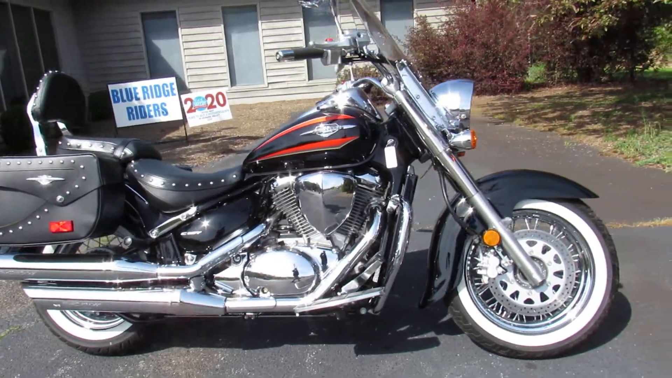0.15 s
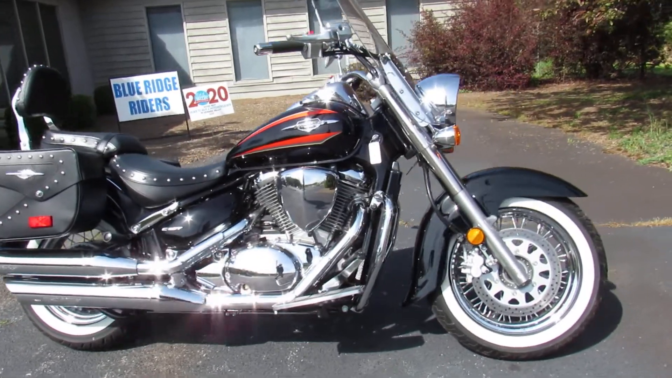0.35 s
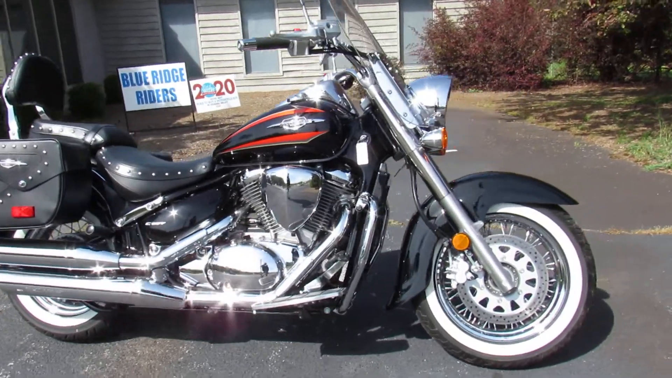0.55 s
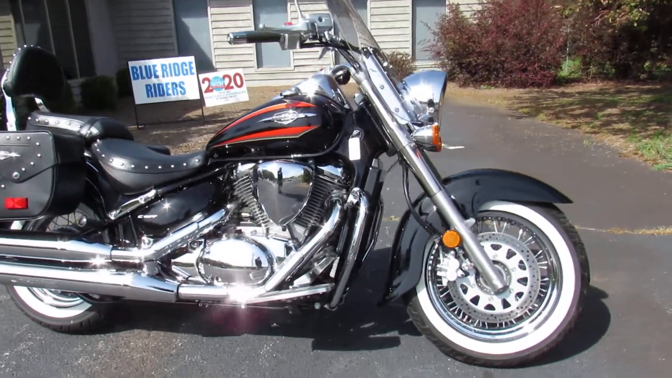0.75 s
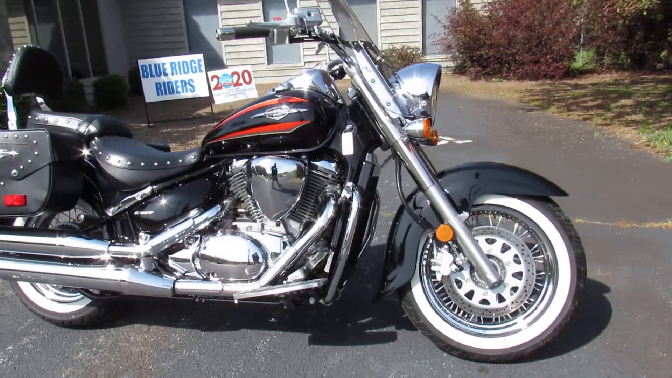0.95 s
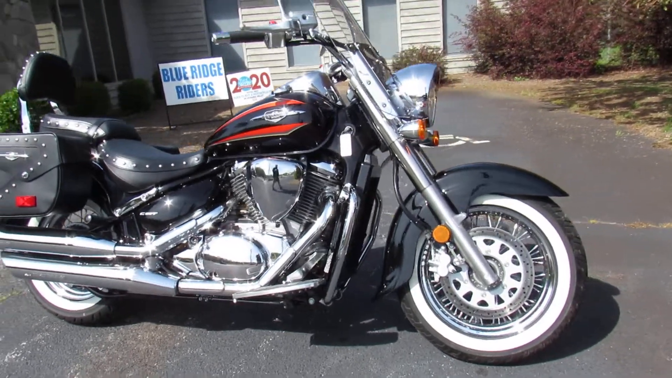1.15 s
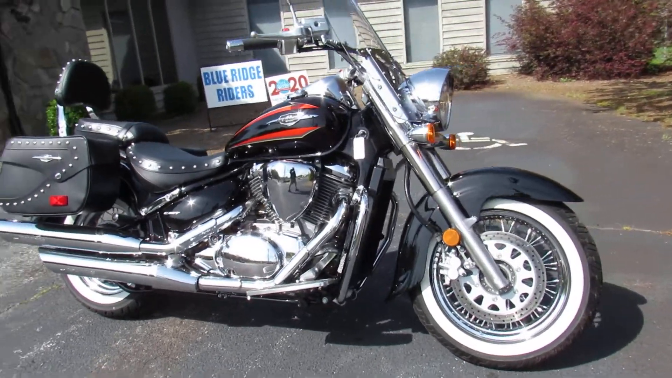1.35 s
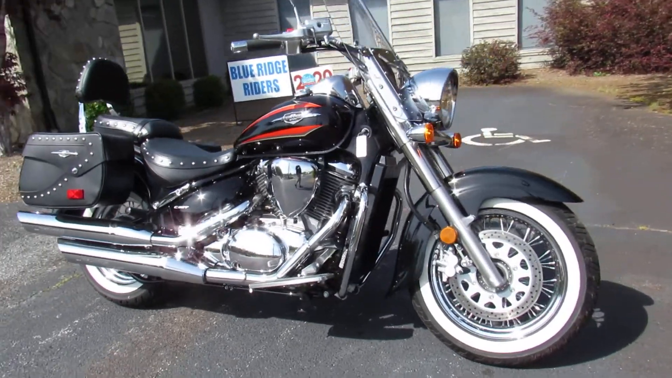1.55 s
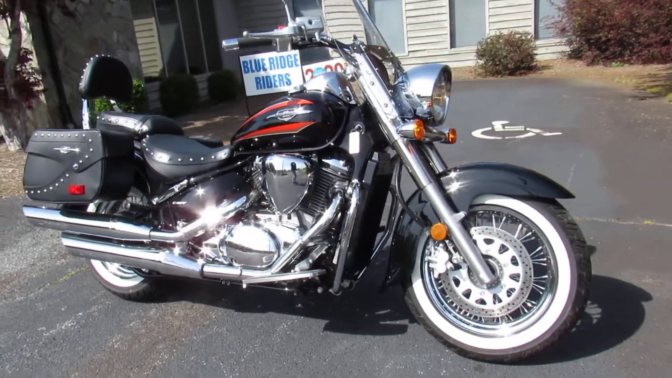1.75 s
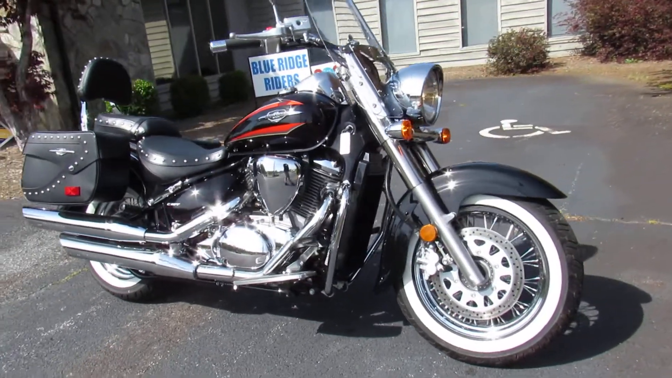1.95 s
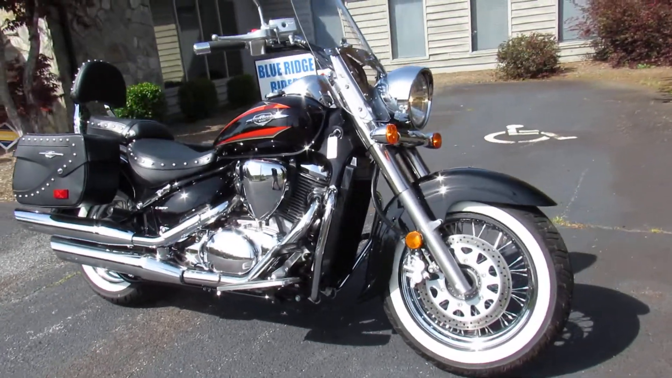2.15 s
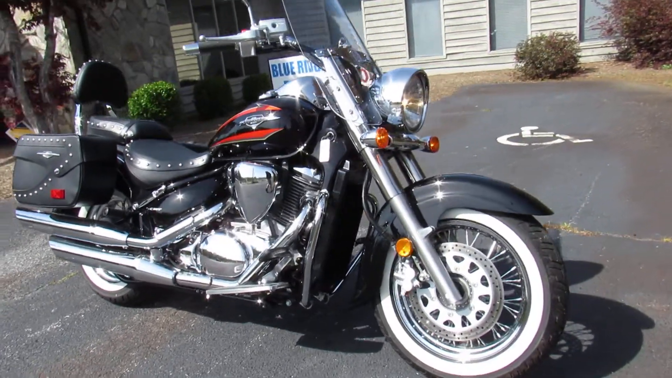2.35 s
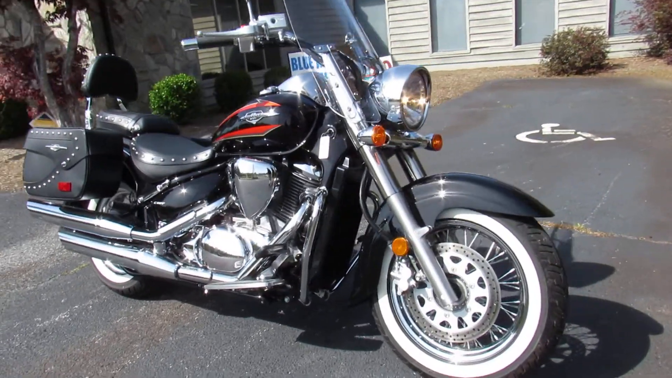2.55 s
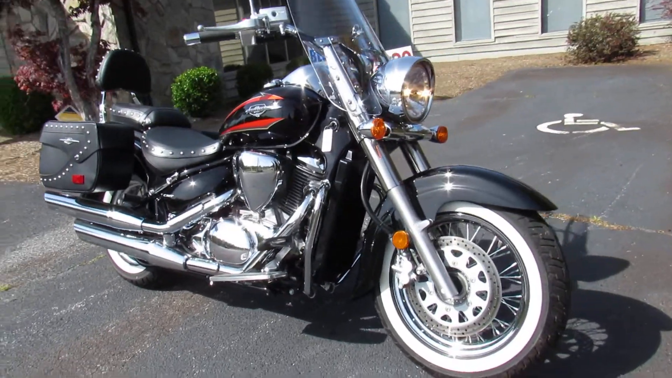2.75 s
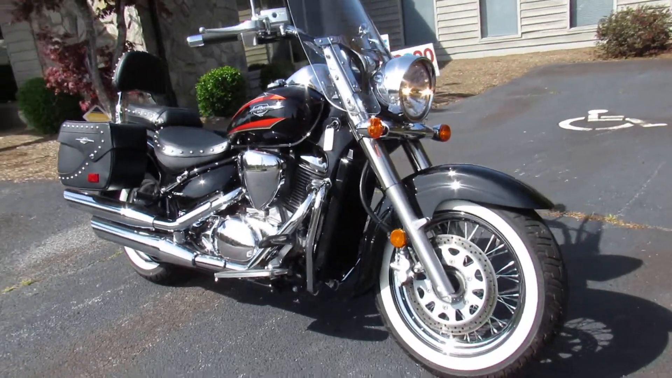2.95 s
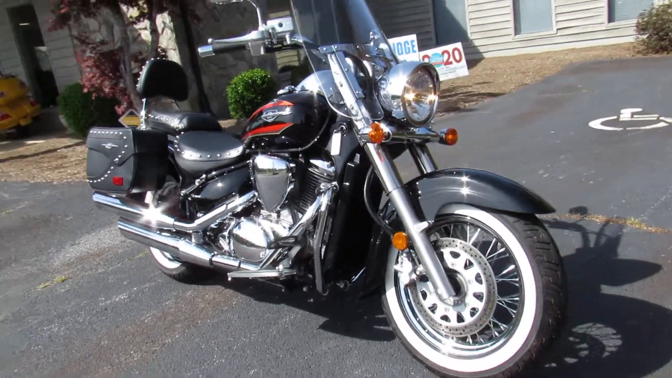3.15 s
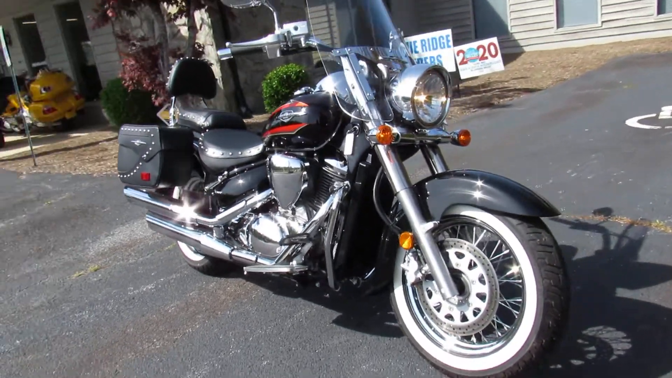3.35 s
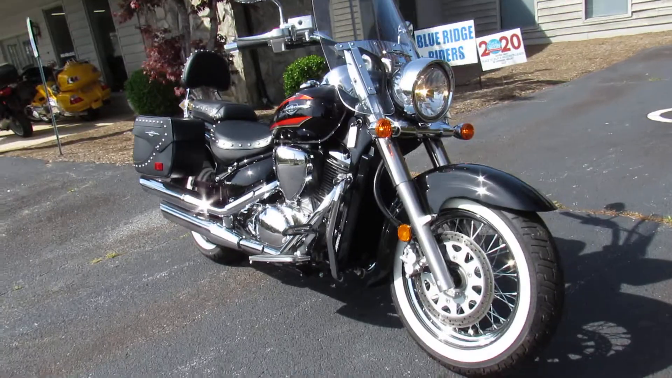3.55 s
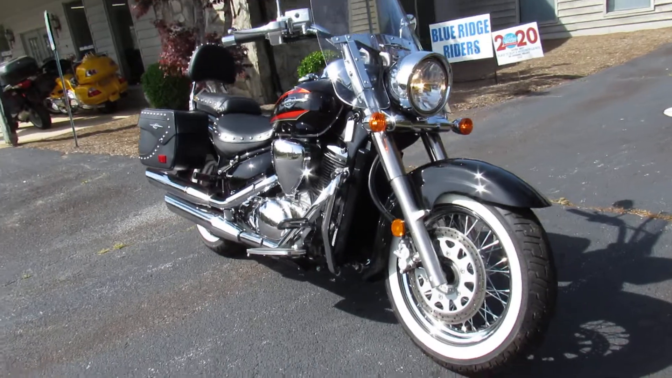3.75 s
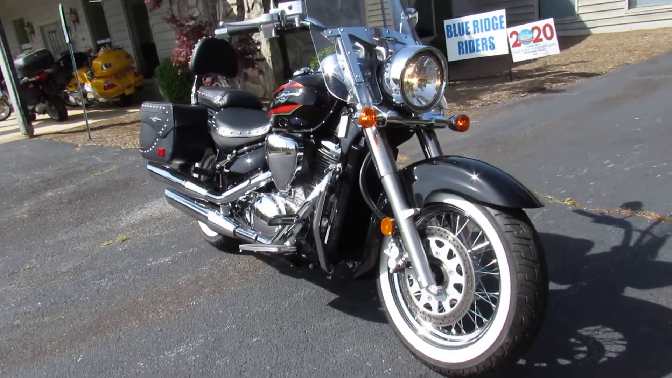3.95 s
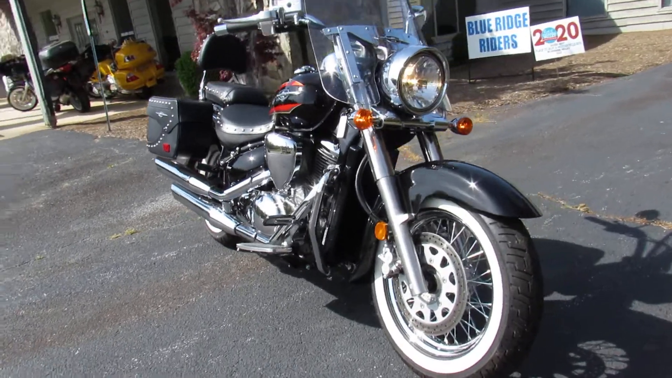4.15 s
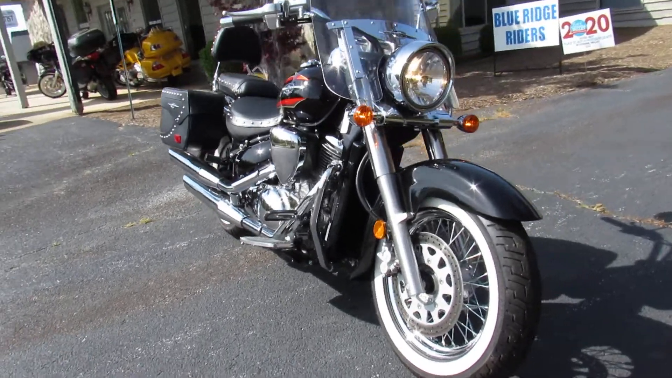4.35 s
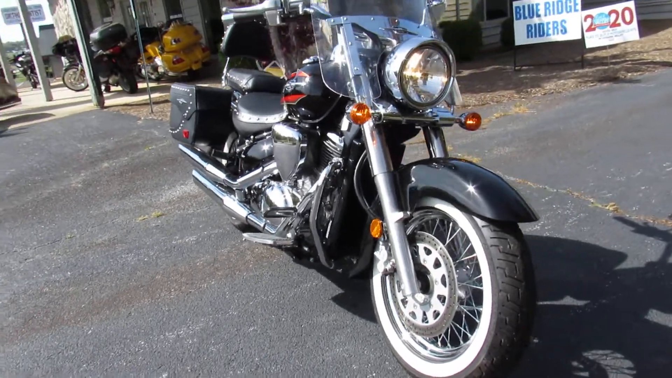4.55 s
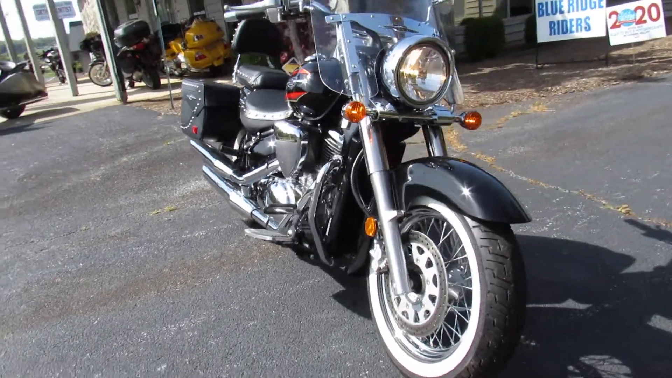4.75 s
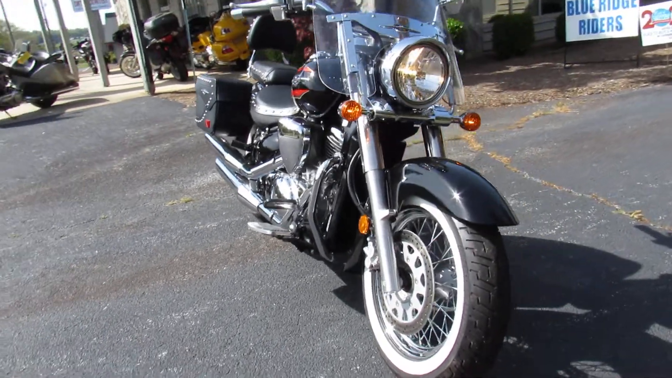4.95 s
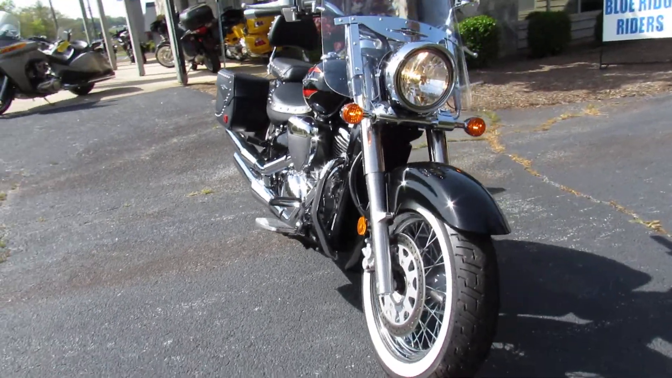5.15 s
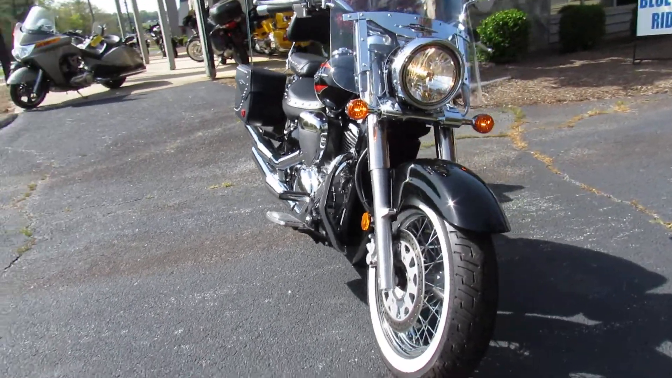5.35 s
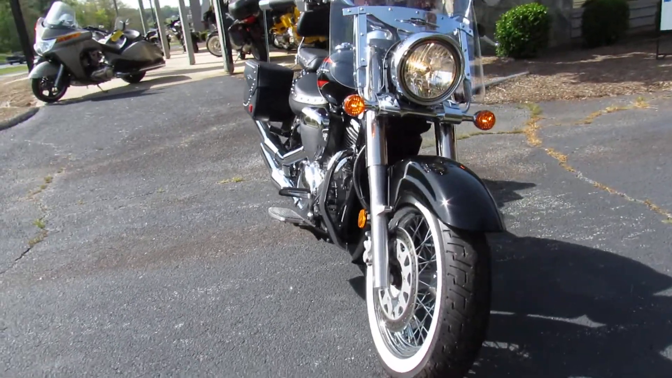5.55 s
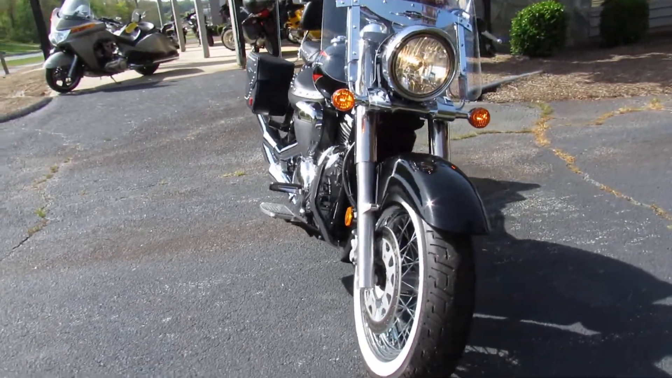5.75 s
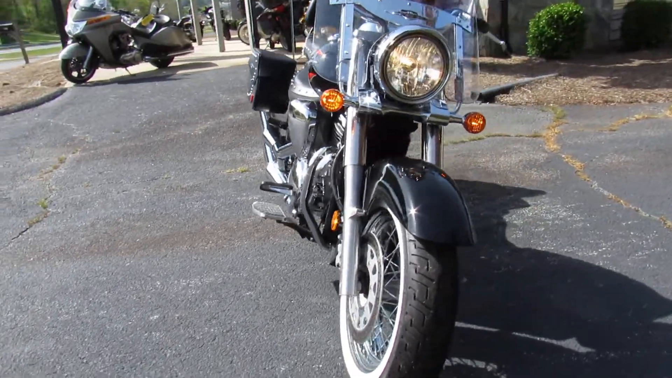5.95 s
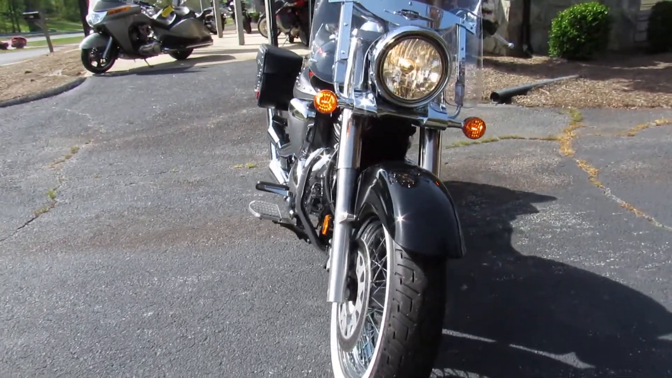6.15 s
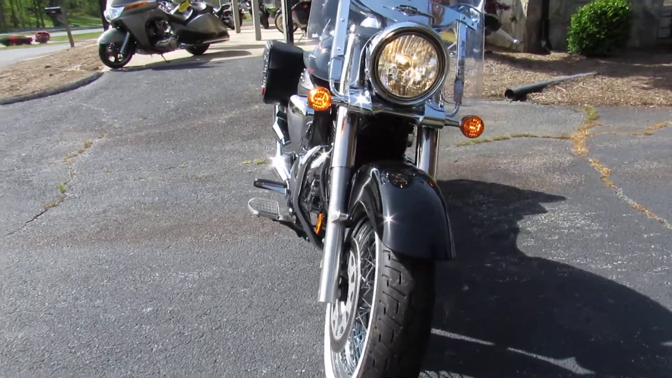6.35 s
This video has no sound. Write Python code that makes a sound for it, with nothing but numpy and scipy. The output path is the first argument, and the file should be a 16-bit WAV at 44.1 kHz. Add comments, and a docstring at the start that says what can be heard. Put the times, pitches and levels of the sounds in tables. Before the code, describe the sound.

Outdoors on a paved lot, a big twin-cylinder motorcycle idles with a lopsided, quick chug. At first it is quiet and wind gusts rumble, flutter and slap the handheld stereo microphone. After about a second and a half the wind fades, and as the microphone walks round toward the front wheel, the exhaust thump, metallic clatter and valve ticking swell, then hold close and loud.

```python
"""Idling V-twin motorcycle, walked round

A V-twin idles on an open car park while a microphone pair comes closer and walks round to the front wheel.
Two unevenly spaced firings a cycle ring two exhaust pipes; intake gulps breathe in an air box.
Shaped noise makes the clatter of pistons, rockers and valves in the finned block.
Early on, gusts and single eddies buffet the microphone ports with rumble and flutter."""
import sys
import numpy as np
from scipy import signal
from scipy.fft import rfft, irfft
from scipy.io import wavfile

SR = 44100
rng = np.random.default_rng(int(sys.argv[2]) if len(sys.argv) > 2 else 0)


def put_to_file(sound):
    """Save the sound as 16-bit audio at rate SR, in the file named by the first command-line argument."""
    columns = np.atleast_2d(sound).T  # one column per channel
    safe = np.clip(columns, -1, 1)
    whole_steps = np.round(safe * 32767)
    wavfile.write(sys.argv[1], SR, whole_steps.astype(np.int16))


N = 282240
TIME, HZ = np.arange(N) / SR, np.fft.rfftfreq(N, 1 / SR)  # s, Hz

# Idle speed in four-stroke cycles: [start_s, cycles_per_s]
IDLE_SPEED = [(0, 9.43), (.625, 9.44), (1.31, 9.524), (1.86, 10.06), (1.93, 9.36), (2.48, 9.648),
              (3.023, 9.992), (3.279, 9.613), (3.601, 10.138), (3.983, 9.639), (4.455, 10.289),
              (4.898, 9.618), (5.018, 9.852), (5.749, 10.006), (6.4, 9.799)]
# Engine loudness on the approach, before each part's own level: [start_s, level_db]
APPROACH = [(0.0, -49), (0.63, -46), (1.47, -45), (5.18, -31.5), (6.3, -33.5)]
EXHAUST_DB, INTAKE_DB, CLATTER_DB, RATTLE_DB, TICKS_DB = 16.5, -6.5, 1.14, -7, -13.5  # on top of APPROACH

# At first the microphones stand beside the mufflers and get more of their thump
BESIDE_DB, BESIDE_S = 1, 2.8
# For a while they face the air box and are turned away from the mufflers
ABREAST_S, ABREAST_HALF_S = 4.2, 0.93
ABREAST_EXHAUST_DB, ABREAST_INTAKE_DB, ABREAST_CLATTER_DB = -0.5, 7, 0.75
# Then at the front, wheel and fork hide the valves, while the exhaust bends round them
HEAD_ON_S, HEAD_ON_TICKS_DB_PER_S, HEAD_ON_EXHAUST_DB_PER_S = 5.13, -1.5, 1.5

# Pipe modes, roughly rising in pitch, sign alternating from row to row, relative levels:
# [pitch_hz, width_hz, level_db]
FRONT_PIPE_MODES = [(45, 11, -5.5), (94, 11, -2), (106, 11, -6), (154, 29, -11), (157, 9, -6.5),
                    (234, 24, -20), (240, 9, -15.5)]
REAR_PIPE_MODES = [(44, 11, -5.5), (95, 11, -4), (138, 17, -6), (135, 50, -9), (168, 11, -13),
                   (209, 14, -16), (210, 50, -19)]
# Ringing of the mufflers' steel shells, relative levels: [pitch_hz, width_hz, level_db]
SHELL_MODES = [(189.7, 22, -25), (264, 24, -25), (340, 8, -28), (389.4, 17, -28.5), (542, 44, -35)]
# Colour of gas rushing out of the mufflers, relative: [pitch_hz, level_db]
RUSH_COLOUR = [(20, -50), (50, -0.5), (90, 1.5), (160, 2.5), (240, -3.5), (300, -8.5), (370, -5),
               (480, -13), (560, -12.5), (900, -15.5), (2000, -57)]

# Blows within one cycle, against the steady churn's scale: [place_cycles, knock_db, rocker_db, decay_s]
BLOWS_IN_CYCLE = [(.135, -4, -6, .006), (.165, -1, -3, .006), (.335, -13, -5, .005), (.775, 1.5, 1.5, .007),
                  (.88, -10, -15, .005)]
# Valves seating within one cycle: [place_cycles, side_db, front_db, decay_s]
SEATS_IN_CYCLE = [(.14, -16, 0, .006), (.36, 0, -2, .006), (.44, -7, -9, .005), (.645, -3, -6, .006),
                  (.755, -4, -5, .007)]
VALVE_DRIFT_CYCLES = -.045  # the ticks come earlier from the front than from the side
# Louder clinks of the cam chain, on the rattle's envelope: [start_s, level_db]
CHAIN_CLINKS = [(1.494, -6), (3.543, 8), (4.1, 4)]
# Colours of block clatter, rocker and chain rattle, and valve ticks, relative: [pitch_hz, level_db]
CLATTER_COLOUR = [(200, -19), (500, -1), (800, -3.5), (990, 1.5), (1250, 0), (1550, -2), (2000, -16),
                  (2700, -13.5), (3400, -22), (4200, -33.5), (7000, -40), (14000, -58)]
RATTLE_COLOUR = [(900, -33), (1450, 3.5), (1900, -1.5), (2400, -2.5), (3200, -9.5), (4300, -18.5),
                 (8000, -45)]
TICK_COLOUR = [(1000, -15), (3000, -10.5), (4200, 2), (4900, 0.5), (6000, 1), (7500, -1), (9000, -2),
               (11000, -11), (13000, -7), (14500, -30)]
# Ringing of cooling fins and covers, over the noise that drives them: [pitch_hz, width_hz, level_db]
FIN_MODES = [(1025, 400, -13), (2020, 230, 0), (2610, 38, 0), (2960, 48, -22), (3094, 140, -5),
             (3430, 170, -2), (3816, 32, 4.5), (4470, 41, -3), (4760, 59, 1), (4890, 38, -1.5),
             (5250, 19, -8), (5905, 20, 2), (6580, 38, -5)]

# Gusts on the ports, pitch gliding from row to row: [middle_s, length_s, rumble_db, flutter_db, flutter_hz]
GUST_LIST = [(0.107, 0.066, -24, -41, 199.3), (0.271, 0.11, -23, -20, 370.7), (0.321, 0.025, -39, -25, 399),
             (.38, 0.037, -26.5, -35, 300), (0.49, 0.14, -33, -36, 250), (0.744, 0.04, -35, -21.5, 300),
             (0.83, 0.094, -20, -25.5, 220), (0.956, 0.032, -42, -50, 220),
             (1.181, 0.12, -28.5, -31, 288.5), (1.269, 0.15, -18.5, -17.5, 327.8),
             (1.41, 0.085, -28, -37, 249.4), (1.543, 0.045, -24, -21.5, 249.2),
             (1.597, 0.064, -17, -21.5, 229.3), (1.672, 0.047, -23, -30, 216.2),
             (2.386, 0.25, -23.5, -42, 220)]
# Colour of the wind rumble, relative: [pitch_hz, level_db]
WIND_COLOUR = [(20, -29), (50, 5), (130, 8.5), (200, 2), (300, -1.5), (450, -17), (900, -35), (2000, -72)]
# Single eddies that slap the ports, peak before limiting: [middle_s, peak_db, pitch_hz]
EDDY_SLAPS = [(.132, -9, 130), (.246, -11, 350), (.256, -11, 300), (.2662, -4, 420), (.304, -11, 330),
              (.327, -11, 360), (.744, -14, 260), (.8228, -15, 260), (.8375, -11, 170), (1.178, -11, 170),
              (1.1987, -9, 380), (1.2263, -8, 300), (1.2315, -9, 400), (1.255, -3, 330), (1.2707, -8, 550),
              (1.286, -5, 380), (1.2968, -9, 420), (1.535, -9, 200), (1.595, -10, 170)]
BREEZE_DB, BREEZE_ENDS_S, LULL_DB_PER_S = -31.5, 1.37, 23  # light air between the gusts, and how it dies away
FLUTTER_POWER = 2.5  # the flutter keeps to the crest of a gust
BUFFET_LEFT = -.7  # share of a shove that the left port takes

# Scattered sound, unlike at the two ports, before its gain is halved: [pitch_hz, level_db]
SCATTERED_SHARE = [(130, -18), (600, -5.5), (1300, -22), (2000, -7), (3800, -31), (5000, -0.5), (9000, -16),
                   (14000, -14)]
# Microphone pair, left over right: [pitch_hz, left_over_right_db]
LEFT_RIGHT_BALANCE = [(110, 6), (370, 4.5), (680, 2.5), (1250, 0), (4100, 0), (5000, 3), (7500, 8.5),
                      (9500, 0), (11000, 0.5), (13500, -3)]
# Microphone pair, how far the left leads: [pitch_hz, left_lead_rad]
LEFT_RIGHT_LEAD = [(500, 0), (950, 0.48), (1700, 0.34), (2600, 0), (4200, 0.2), (7000, -1.26), (9000, -2.5),
                   (11000, -2.5)]
CUTOFF_HZ = 14400


def amp(db):
    """Decibels to gain."""
    return 10 ** (np.asarray(db) / 20)


def unit(x):
    """Scales to rms 1."""
    return x / np.sqrt(np.mean(x ** 2) + 1e-20)


def curve(rows):
    """A time table at every sample."""
    return np.interp(TIME, *np.transpose(rows))


def across(points):
    """A frequency table at every bin, interpolated along log frequency."""
    hz, value = np.transpose(points)
    return np.interp(np.log(HZ + 1), np.log(hz), value)


def filtered(x, response):
    """Applies a frequency response."""
    return irfft(rfft(x) * response, N)


def mode(hz, width):
    """Response of one resonance, gain 1 at its centre."""
    return 1j * HZ * width / (hz ** 2 - HZ ** 2 + 1j * HZ * width)


def modes_sum(modes):
    """Resonances of one body side by side."""
    return sum(amp(db) * mode(hz, width) for hz, width, db in modes)


def strokes(place, spread_db, jitter_s, drift=0):
    """One impulse a cycle, at a place in it that may drift during the walk; strength and timing vary."""
    turns = np.cumsum(curve(IDLE_SPEED)) / SR
    whole = np.arange(-1, int(turns[-1]) + 1)
    cycles = whole + place + drift * whole / turns[-1]
    late, strong = rng.standard_normal((len(cycles), 2)).T
    at = np.interp(cycles, turns, TIME) + jitter_s * late
    inside = cycles < turns[-1]
    samples = np.clip(at[inside] * SR, 0, N - 1).astype(int)
    train = np.zeros(N)
    train[samples] = amp(spread_db * strong[inside])
    return train


def dying(train, decay_s):
    """Each impulse starts an exponential decay."""
    return signal.lfilter([1], [1, -np.exp(-1 / (SR * decay_s))], train)


def turbulence(envelope, response, polarity=1, scatter_db=None):
    """Enveloped noise in one body, rms 1: a direct part both channels share and a scattered part they do not."""
    direct, scattered = filtered(envelope * rng.standard_normal((2, N)), response)
    share_db = across(SCATTERED_SHARE) if scatter_db is None else scatter_db
    scattered = filtered(scattered, amp(share_db) / 2)
    return unit(np.array([direct + scattered, polarity * (direct - scattered)]))


def heard(db, abreast_db=0, head_on_db_per_s=0):
    """Gain of one engine part: it follows the approach and the way round the bike."""
    abreast = np.exp(-((TIME - ABREAST_S) / ABREAST_HALF_S) ** 2)
    head_on_s = np.maximum(TIME - HEAD_ON_S, 0)
    return amp(curve(APPROACH) + db + abreast_db * abreast + head_on_db_per_s * head_on_s)


def muffler():
    """The packing takes the edge off each pulse."""
    return 1 / (1 + (HZ / 1100) ** 4)


def pipe(train, modes):
    """Firings ring a pipe; at the open end its modes alternate in sign and deep bass radiates poorly."""
    response = sum((-1) ** k * amp(db) * mode(hz, width) for k, (hz, width, db) in enumerate(modes))
    ringing = filtered(train, response * muffler())
    return signal.sosfilt(signal.butter(3, 60, "high", fs=SR, output="sos"), ringing)


def exhaust():
    """The rear cylinder fires .35 cycle after the front; each thumps and rushes, and a third train rings the shells."""
    front = strokes(place=.993, spread_db=.55, jitter_s=.0002)
    rear = strokes(place=.343, spread_db=.55, jitter_s=.0002)
    beside_db = BESIDE_DB * np.exp(-(TIME / BESIDE_S) ** 2)
    thump = amp(65.5 + beside_db) * (pipe(front, FRONT_PIPE_MODES) + pipe(rear, REAR_PIPE_MODES))
    shell_blows = strokes(place=.213, spread_db=1., jitter_s=.0002)
    shell = amp(60) * filtered(shell_blows, modes_sum(SHELL_MODES) * muffler())
    # a steady stream of gas, with a puff at each firing
    flow = 1.4 + dying(front, decay_s=0.016) + 0.42 * dying(rear, decay_s=0.017)
    rush = amp(-11.5) * turbulence(flow, amp(across(RUSH_COLOUR)))
    return (thump + shell + rush) * heard(EXHAUST_DB, ABREAST_EXHAUST_DB, HEAD_ON_EXHAUST_DB_PER_S)


def intake(box_hz=264.8, box_width_hz=61.0, gulp_db=53):
    """Each gulp of air thumps and then breathes in the air box, heard best from beside the engine."""
    gulps = strokes(place=.2, spread_db=1.0, jitter_s=.0002)
    box = mode(box_hz, box_width_hz) ** 2
    breath = turbulence(0.29 + dying(gulps, decay_s=0.17), box)
    thump = amp(gulp_db) * filtered(gulps, box)
    return (breath + thump) * heard(INTAKE_DB, ABREAST_INTAKE_DB)


def walked(x, ripple_db=2.0, ripple_hz=34.96, count=4):
    """Countless weak modes of the castings ripple the response, crossfading between sides passed on the walk."""
    out = np.zeros_like(x)
    position = np.linspace(0, count - 1, N)
    for side in range(count):
        ripple = np.interp(HZ / ripple_hz, np.arange(len(HZ)), rng.standard_normal(len(HZ)))
        nearness = np.maximum(1 - abs(position - side), 0)
        out += nearness * filtered(x, amp(ripple_db * ripple))
    return out


def block(slaps_per_s=64.0, slap_db=-9):
    """Piston and rocker knocks, valve ticks and stray chain slaps rise from the gears' churn and ring the fins."""
    slap_hits = rng.random(N) * (rng.random(N) < slaps_per_s / SR)
    slaps = dying(slap_hits, decay_s=0.004)
    knocks, rocks, ticks = amp(slap_db) * slaps, np.zeros(N), np.zeros(N)
    for place, knock_db, rocker_db, decay_s in BLOWS_IN_CYCLE:
        blow = dying(strokes(place, spread_db=1.4, jitter_s=.0008), decay_s)
        knocks += amp(knock_db) * blow
        rocks += amp(rocker_db) * blow
    for place, side_db, front_db, decay_s in SEATS_IN_CYCLE:
        seat = dying(strokes(place, spread_db=1.5, jitter_s=.0005, drift=VALVE_DRIFT_CYCLES), decay_s)
        ticks += amp(np.linspace(side_db, front_db, N)) * seat
    clinks = sum(amp(db) * (TIME > s) * np.exp(-abs(TIME - s) / .008) for s, db in CHAIN_CLINKS)
    fins = 1 + modes_sum(FIN_MODES)
    # the constant in each envelope is the steady churn
    clatter = turbulence(1.8 + knocks + .5 * clinks, fins * amp(across(CLATTER_COLOUR)))
    rattle = turbulence(.85 + rocks + .5 * slaps + clinks, fins * amp(across(RATTLE_COLOUR)))
    ticking = turbulence(1.15 + ticks, fins * amp(across(TICK_COLOUR)))
    out = walked(clatter) * heard(CLATTER_DB, ABREAST_CLATTER_DB)
    out += walked(rattle) * heard(RATTLE_DB)
    out += walked(ticking) * heard(TICKS_DB, head_on_db_per_s=HEAD_ON_TICKS_DB_PER_S)
    return out


def buffets():
    """Each eddy gives the ports one short shove, with a rebound on either side."""
    out = np.zeros(N)
    for s, db, hz in EDDY_SLAPS:
        u = (np.pi * hz * (TIME - s)) ** 2
        out += amp(db) * (1 - 2 * u) * np.exp(-np.minimum(u, 50))
    return np.array([BUFFET_LEFT * out, out])


def wind(flutter_hz=306.3, flutter_width_hz=130.0, limit=.8):
    """Gusts swell out of a breeze and push the ports mostly opposite ways; the flutter's pitch follows them."""
    push = amp(BREEZE_DB - LULL_DB_PER_S * np.maximum(TIME - BREEZE_ENDS_S, 0))
    puffs = np.zeros(N)
    for s, length, rumble_db, flutter_db, _ in GUST_LIST:
        swell = np.exp(-(2 * (TIME - s) / length) ** 2)
        push += amp(rumble_db) * swell
        puffs += amp(flutter_db) * swell ** FLUTTER_POWER
    wander = unit(filtered(rng.standard_normal(N), np.exp(-(HZ / 70) ** 2)))
    eddies = amp(2.5 * wander)  # level wanders by 2.5 dB rms
    rumble = push * turbulence(eddies, amp(across(WIND_COLOUR)), polarity=-1.05, scatter_db=-3.5)
    port = mode(flutter_hz, flutter_width_hz) ** 2 / (1 + (HZ / 1400) ** 4)
    hum = turbulence(eddies, port, polarity=-0.96, scatter_db=-7.5)
    # faster air sheds eddies faster: play the noise at a speed that follows the pitch
    pitch = curve([(row[0], row[4]) for row in GUST_LIST])
    passed = np.cumsum(pitch) / flutter_hz / SR
    flutter = puffs * np.array([np.interp(passed, TIME, side) for side in hum])
    return limit * np.tanh((rumble + flutter + buffets()) / limit)  # the capsules bottom out


def scene():
    """The engine reaches the ports with a level and phase difference; the wind acts on them directly."""
    half = amp(across(LEFT_RIGHT_BALANCE) / 2) * np.exp(.5j * across(LEFT_RIGHT_LEAD))
    soft_ends = signal.windows.tukey(N, .002)
    engine = soft_ends * (exhaust() + intake() + block())
    return filtered(engine, np.array([half, 1 / half])) + wind()


def record(dry, notch_hz=700.6, notch_width_hz=170.0, notch_depth=0.8):
    """A notch thins the low midrange and a steep low-pass ends the treble."""
    coloured = filtered(dry, 1 - notch_depth * mode(notch_hz, notch_width_hz))
    lowpass = signal.firwin(511, CUTOFF_HZ, window=("kaiser", 9), fs=SR)
    return signal.oaconvolve(coloured, lowpass[None], "same")


dry = scene()
out = record(dry)
put_to_file(out)
```